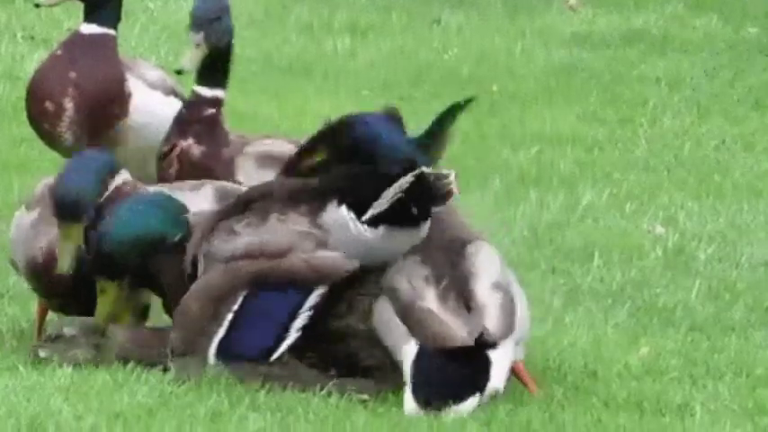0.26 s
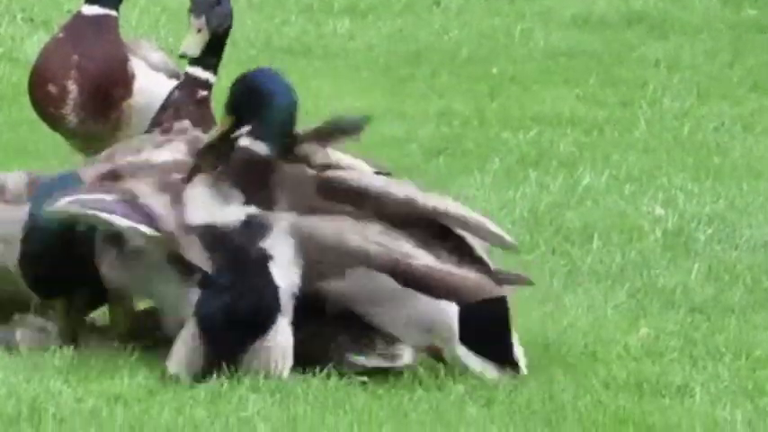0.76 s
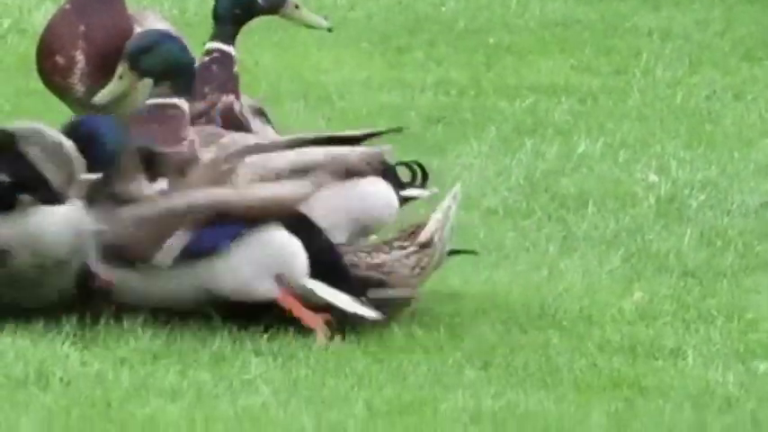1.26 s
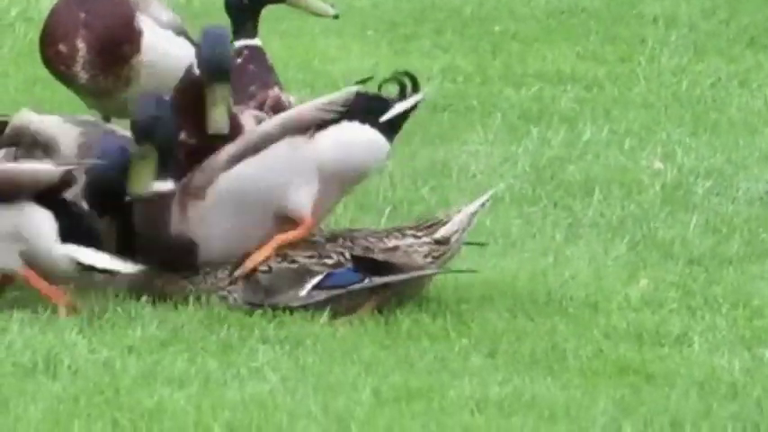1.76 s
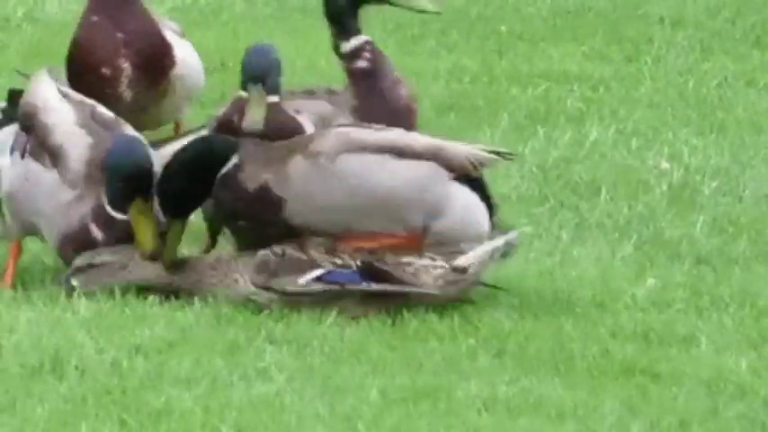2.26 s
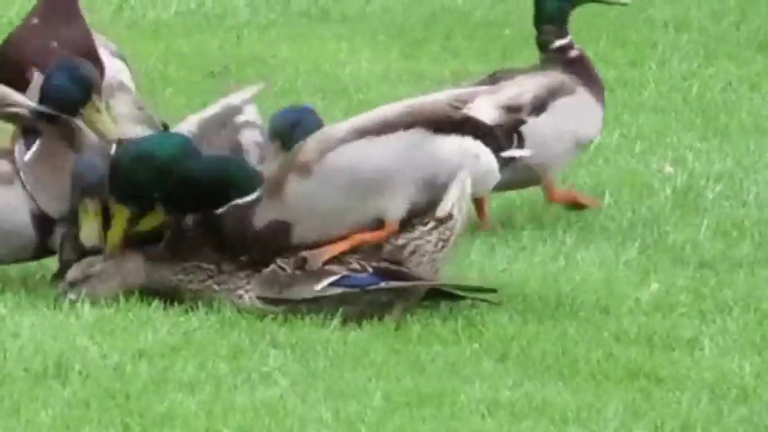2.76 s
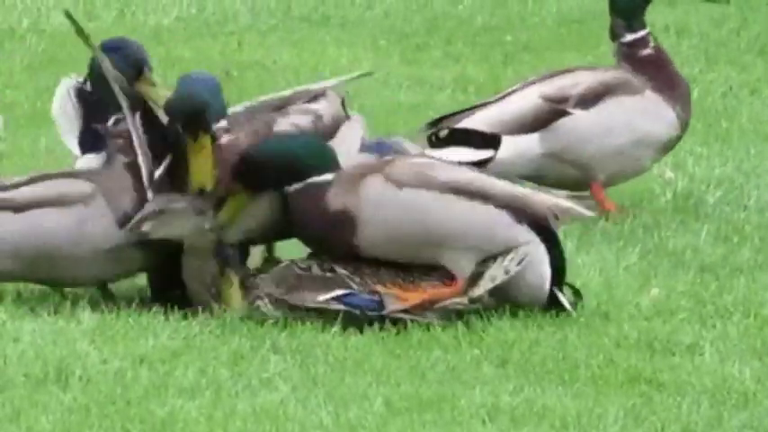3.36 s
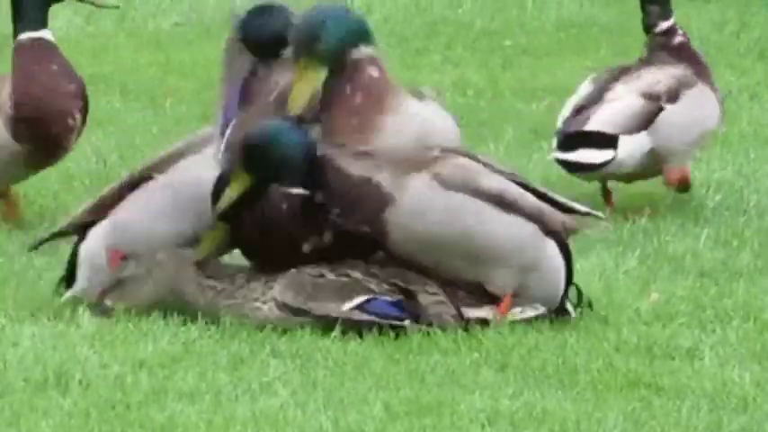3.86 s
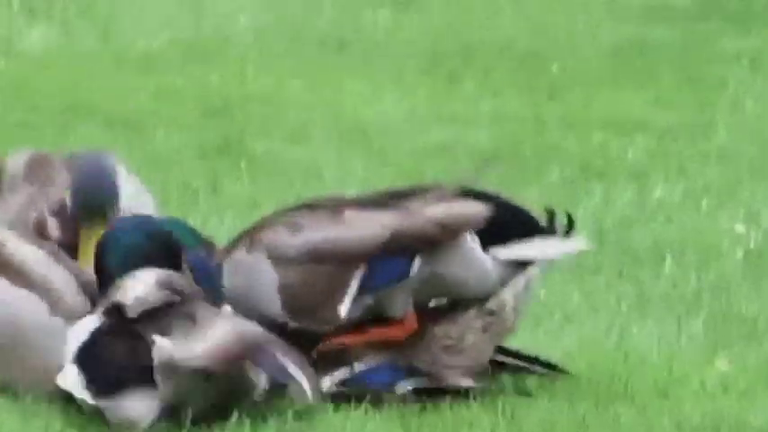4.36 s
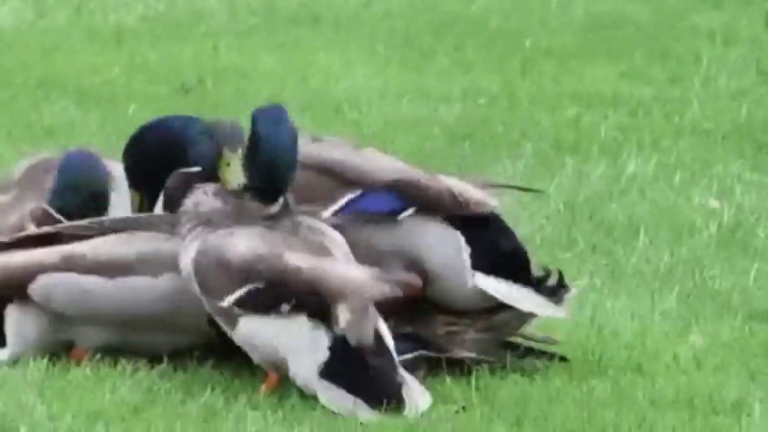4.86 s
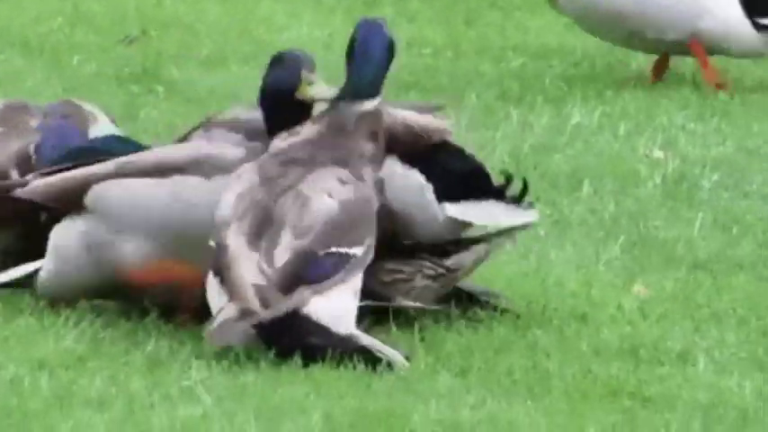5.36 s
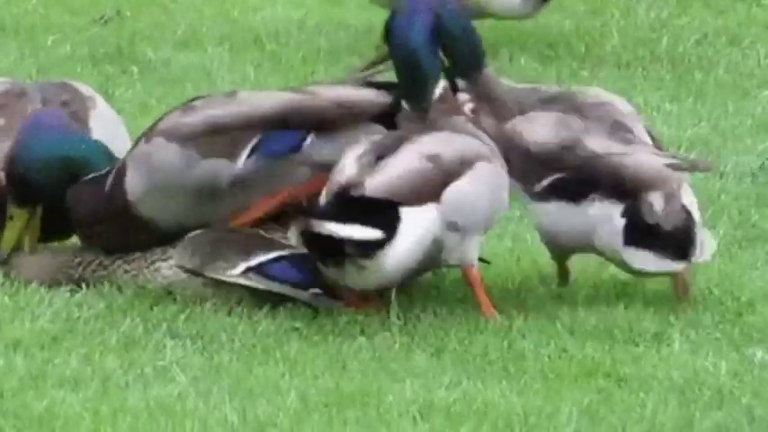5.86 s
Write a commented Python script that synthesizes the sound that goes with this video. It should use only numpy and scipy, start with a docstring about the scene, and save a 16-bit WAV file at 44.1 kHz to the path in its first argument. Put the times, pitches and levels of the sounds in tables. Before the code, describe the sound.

Close outdoor sound of ducks struggling on a lawn: short nasal quacks breaking between clean squeals and rough honks, loudest just after three seconds and again near five. Before them, soft wings flutter quickly and one body knock lands at about two seconds. Dry bill clicks dot the scuffle. High small birds chirp throughout, with far birds behind, light echoes, soft air hiss and low hum.

```python
"""On a lawn, ducks scuffle: a hen quacks in clusters, slipping between clean squeals and rough honks.
Honks are uneven noisy pulses through throat resonances; squeals are a few partials gliding on one pitch.
Bills click as short rings, wings flap as grainy feather noise, and one knock rings a set of struck modes.
Small birds chirp as thin sliding tones and chatter in noisy notes; sparse echoes follow ducks and birds.
Behind lie a faint hiss and low hum, and far birds as patchy banded noise."""
import sys
import numpy as np
from scipy import signal
from scipy.io import wavfile
from scipy.ndimage import uniform_filter1d

SR = 44100
rng = np.random.default_rng(int(sys.argv[2]) if len(sys.argv) > 2 else 0)


def gain_from_db(level_db):
    """Turn a decibel level (scalar or array-like) into a linear amplitude factor."""
    decades = np.asarray(level_db, float) / 20
    return 10 ** decades


def int16_out(signal):
    """Quantize to a 16-bit WAV file."""
    q = np.round(np.clip(np.atleast_2d(signal).T, -1, 1) * 32767)
    wavfile.write(sys.argv[1], SR, q.astype(np.int16))


N = 269892  # samples in the scene

# rough cores of the quacks: (start [s], length [s], effort [dB], highest pitch [Hz], fundamental level [dB])
HONKS = [(0.057, 0.098, -42, 449.7, -46.5), (0.272, 0.0703, -39.5, 432.2, -48),
         (2.956, 0.068, -32.5, 470.6, -45), (3.04, 0.034, -45.5, 438, -53), (3.1, 0.061, -34, 451.5, -50),
         (3.158, 0.087, -22.5, 432.5, -32.5), (3.4, 0.055, -24, 404.3, -34.5),
         (4.749, 0.0544, -34, 462.8, -44), (4.957, 0.028, -28.5, 465, -40),
         (4.981, 0.039, -22.5, 475.8, -34.5), (6.067, 0.029, -28.5, 465.7, -50)]
# squeals that swell into a honk: (start [s], length [s], crest time [s], crest pitch [Hz], level [dB])
LEAD_SQUEALS = [(0.232, .044, 0.262, 1950, -38), (2.944, .017, 2.925, 2000, -34),
                (3.1, .027, 3.145, 1550, -32), (3.128, .03, 3.128, 1880, -26),
                (3.394, .013, 3.385, 2000, -30), (4.72, .04, 4.731, 2170, -39),
                (4.89, .026, 4.945, 1800, -43), (4.935, .04, 4.946, 1820, -25),
                (6.035, .032, 6.045, 2060, -42)]
# squeals that open or close a honk without a swell:
# (start [s], length [s], crest time [s], crest pitch [Hz], level [dB])
END_SQUEALS = [(0.044, .02, 0.028, 1950, -44), (0.335, .03, 0.33, 1850, -45),
               (3.015, .062, 3.032, 1780, -33), (3.234, .025, 3.228, 1350, -29),
               (3.478, .013, 3.445, 2200, -30), (4.798, .037, 4.806, 1800, -34),
               (4.928, .016, 4.94, 1800, -43), (5.015, .041, 5.018, 1820, -31),
               (6.094, .03, 6.108, 1740, -38)]
# squeals that hold or slide in a straight line: (start [s], length [s], first pitch [Hz], last pitch [Hz], level [dB])
HELD_SQUEALS = [(0.073, 0.085, 1406, 1242, -40), (0.279, 0.06, 1360, 1318, -35),
                (2.963, .06, 1317, 1445, -34), (3.153, .015, 1357, 1500, -24.5),
                (3.168, 0.026, 1733, 1850, -29.5), (3.21, 0.028, 1430, 1304, -29),
                (3.215, .02, 1897, 2170, -29.5), (4.835, .035, 850, 720, -52),
                (4.911, .02, 1150, 1780, -32), (3.434, .018, 1184, 1215, -30),
                (4.757, 0.035, 1310, 1400, -30.5), (6.065, 0.021, 1614, 1440, -28)]
# tones within a squeal: (multiple of its pitch [ratio], relative level [dB])
SQUEAL_PARTIALS = [(.5, -13), (1, 0), (1.5, -17), (2, -19)]
# throat resonances with the bill open and steady: (centre [Hz], width [Hz], relative level [dB])
THROAT_MODES = [(850, 230, -14), (1261, 300, -7), (1850, 560, 0), (2252, 280, -2.5), (2686, 600, -5),
                (3500, 270, -17.5), (4047, 214, -16.5), (4740, 220, -17.5)]
# quacks of distant ducks: (start [s], length [s], effort [dB], starting pitch [Hz])
FAR_QUACKS = [(1.182, 0.0776, -48.5, 358.7), (4.069, 0.0724, -60, 398)]
# throat resonances of the distant ducks: (centre [Hz], width [Hz], relative level [dB])
FAR_THROAT_MODES = [(382, 95, -16), (760, 170, 0), (1090, 380, 5.5), (1470, 780, -3.5)]
# bill clicks: (time [s], level of the main ring [dB], ring pitch [Hz])
CLICKS = [(0.013, -50, 2770), (0.211, -40, 560), (0.233, -39, 790), (1.751, -43, 2170),
          (2.019, -38.5, 1830), (2.066, -50, 3330), (2.377, -51.5, 495), (2.457, -52.5, 514),
          (2.896, -45, 643), (2.9, -37.5, 1060), (3.353, -25.5, 1450), (3.3591, -21, 1050),
          (3.367, -24, 1190), (4.332, -43.5, 496), (4.681, -31, 1615), (6, -34, 867)]
# wing strokes, before STROKE_DB and STROKE_SPREAD: (start [s], level [dB], length [s])
WING_STROKES = [(1.538, -44.5, 0.013), (1.578, -39.5, 0.023), (1.603, -32.5, 0.015), (1.618, -36.5, 0.022),
                (1.655, -44, 0.024), (1.698, -39.5, 0.023), (1.724, -51.5, 0.014), (1.761, -45.5, 0.017),
                (1.796, -50, .02), (1.833, -45.5, 0.021), (1.859, -42, 0.02), (1.893, -41, 0.022),
                (1.948, -40, 0.019), (2.002, -41, 0.018), (2.046, -49, 0.027), (2.089, -52.5, .02),
                (2.119, -50.5, 0.023), (2.174, -53.5, 0.026), (2.211, -52, 0.018), (2.251, -56, 0.021)]
# feathers sliding between strokes: (time [s], level [dB])
FEATHER_SLIDE = [(1.53, -72), (1.6, -66.5), (2.2, -66.5), (2.4, -82)]
# spectrum of feather noise: (frequency [Hz], relative level per Hz [dB])
FEATHER_SPECTRUM = [(300, -15.5), (1000, -9), (2000, -1), (3200, 3), (5500, 0), (7500, -5), (8400, -8),
                    (9000, -23)]
# modes rung by the knock: (frequency [Hz], relative level [dB], time to fall 60 dB [s])
KNOCK_MODES = [(242, -7, 0.01), (673, 5, 0.011), (940, 1.5, 0.022), (1400, -8.5, 0.027),
               (2790, -6.5, 0.013), (4870, -10, 0.0088)]
# chirps that slide down and level off: (start [s], length [s], top pitch [Hz], low pitch [Hz], level [dB])
SLIDING_CHIRPS = [(0.41, .07, 3560, 2615, -57), (0.545, 0.082, 4250, 2973, -57),
                  (0.651, 0.066, 4425, 2557, -54.5), (2.887, 0.068, 4060, 3050, -60.5),
                  (3.035, 0.078, 4130, 3980, -48.5), (3.247, .06, 3900, 3570, -53),
                  (3.452, .08, 4140, 3260, -49), (5.26, 0.046, 4520, 3500, -56.5),
                  (5.296, 0.067, 3890, 3306, -50), (5.523, 0.055, 2495, 2125, -63),
                  (5.918, 0.088, 4420, 3293, -58.5)]
# chirps that drop fast and then hold low: (start [s], length [s], top pitch [Hz], low pitch [Hz], level [dB])
SETTLING_CHIRPS = [(0.765, 0.082, 4420, 3020, -59.5), (1.397, .08, 4270, 3400, -63),
                   (3.788, .075, 4010, 3092, -54), (4.04, 0.064, 4150, 3220, -52.5),
                   (4.67, 0.081, 4300, 3398, -56.5)]
# chirps that fall and hook back up: (start [s], fall time [s], top pitch [Hz], low pitch [Hz], level [dB])
HOOKED_CHIRPS = [(1.095, 0.031, 3986, 3395, -55.5), (2.48, 0.045, 4150, 3700, -62.5),
                 (2.765, 0.044, 4100, 3800, -55.5), (3.787, .058, 4455, 3500, -55.5),
                 (4.075, 0.053, 4390, 3470, -52.5), (4.377, 0.023, 3880, 3346, -51.5),
                 (4.407, 0.057, 4320, 3616, -51.5), (4.714, 0.027, 3910, 3427, -50.5),
                 (5.036, 0.039, 4200, 3650, -46), (5.05, 0.026, 3895, 3410, -45.5),
                 (5.562, .062, 4350, 3560, -56)]
# harsh chatter notes: (start [s], level [dB], decay length [s])
CHATTER_NOTES = [(0.018, -59, 0.038), (0.065, -44.5, 0.0079), (0.095, -49, 0.016), (0.144, -54.5, 0.029),
                 (0.191, -49, 0.018), (0.22, -52, 0.044), (0.27, -48, 0.012), (0.298, -52, 0.0077),
                 (0.341, -53, 0.027), (0.388, -57.5, 0.025), (0.414, -58, 0.015), (0.431, -55, 0.023),
                 (4.255, -50, 0.012), (4.275, -48.5, 0.008), (5.437, -60.5, 0.027), (5.647, -42.5, 0.0065),
                 (5.66, -53, 0.017)]
# fixed bands of the chatter: (centre [Hz], width [Hz], relative level [dB])
CHATTER_BANDS = [(2710, 140, 0), (3576, 410, 4), (4490, 140, -12), (5435, 176, 4), (5810, 230, -11),
                 (6910, 220, -9)]
# swells of the far birds: (time [s], level [dB])
FAR_BIRD_LEVEL = [(0, -68.5), (.45, -68), (.75, -74), (2.8, -76), (3.55, -62), (4.6, -67.5), (5.2, -70),
                  (6.2, -72)]
# spectrum of the far birds: (frequency [Hz], relative level per Hz [dB])
FAR_BIRD_SPECTRUM = [(3000, -13.5), (3400, -4.5), (3800, -7), (4300, -14), (5500, -17.5), (6000, -50.5)]
# spectrum of the outdoor hiss: (frequency [Hz], relative level per Hz [dB])
AIR_SPECTRUM = [(15, -48), (28, -14.5), (50, 5.5), (70, 12), (106, 9.5), (234, 2.5), (627, -1.5),
                (1570, -9), (1900, -8.5), (2200, -17), (2710, -11), (2950, -17.5), (3710, -22.5),
                (4820, -23), (5600, -26), (8160, -45.5)]

# Voice: pulses alternate strong and weak; each carries a puff of noise
HONK_NOISE_SHARE, FAR_NOISE_SHARE = 0.55, 0.58
PAIR_DB, UNEVEN_DB = 3.5, 1.8  # strong-weak step and scatter, both scaled by the noise share
PAIR_HOLD = 0.9  # a normal draw below this swaps strong and weak at the next pulse
PUFF_DECAY_CYCLES = 0.45
BILL_SAG, BILL_WANDER = 0.26, 0.09  # fraction by which resonances drop as the bill shuts, and wander
BODY_TOP_HZ = 3350  # low-pass on the body of the voice; the thin resonances bypass it
HONK_RISE_S, HONK_FALL_S, HONK_TAIL_S = 0.012, 0.006, 0.024
SWELL_DB, TAIL_DB = 2, -14.5  # effort grows through the core, then drops to the tail
PITCH_ARCH, END_SAG = 0.03007, 0.05  # fractions of the pitch
FAR_SWELL_DB, FAR_PITCH_RISE = 6.5, 0.163  # the rise is a fraction of the pitch

# Squeals
RISE_BEND_HZ_PER_S2, FALL_BEND_HZ_PER_S2 = 420000, 620000
LOWEST_HZ = 990  # where a falling squeal levels off
LEAD_SWELL_DB_PER_S, SWELL_RANGE_DB = 700, 17  # a swell starts no softer than the range
RASP_DB, RASP_HZ = -9, 440  # rough voice under a squeal

# Bills and wings
SCRAPE_DB, SCRAPE_T60_S = -13.5, 0.1  # a click drags a short scrape behind it
STROKE_DB, STROKE_RISE_S, STROKE_SPREAD = -5, 0.015, 1.28
KNOCK_S, KNOCK_DB, PUSH_DB = 1.9285, -30, -40.5

# Small birds and background
SLIDE_POWER, SETTLE_POWER, HOOK_POWER = 1.6, 2.8, 1.6  # higher falls faster at first
HOOK_S, HOOK_HZ = 0.043, 300
CHIRP_RISE_DB, CHIRP_FADE_DB = 6, 5  # softer at either end
CHATTER_RISE_S = 0.002
AIR_DB, HUM_HZ, HUM_DB = -63.5, 108, -72

# Bass cut under loud sound: threshold, cut per dB above it, limit
BASS_CUT_FROM_DB, BASS_CUT_SLOPE, BASS_CUT_MOST_DB = -38, 1.6, 15.5


def evened(x):
    """Scales to rms 1."""
    return x / np.sqrt(np.mean(x ** 2) + 1e-20)


def span(length):
    """Sample times from zero to length."""
    return np.arange(0, length, 1 / SR)


def add(mix, start, sound):
    """Mixes a sound in at its start time, cutting what runs past the end."""
    part = mix[round(start * SR):][:len(sound)]
    part += sound[:len(part)]


def level_curve(rows):
    """Joins (time, level) rows by straight lines, one value a sample."""
    times, levels = np.transpose(rows)
    return np.interp(np.arange(times[0], times[-1], 1 / SR), times, levels)


def wobble(n, hz):
    """Random drift of rms 1: white noise smoothed by a one-pole low-pass."""
    noise = rng.standard_normal(n + 2000)
    drift = signal.lfilter([1], [1, -np.exp(-2 * np.pi * hz / SR)], noise)
    return evened(drift[2000:])  # skip the filter's start


def dulled(x, hz):
    """Steep low-pass."""
    return signal.sosfilt(signal.butter(10, hz, fs=SR, output="sos"), x)


def resonate(x, hz, width):
    """A steep-sided resonance of gain 1, fixed or moving: shift to zero, smooth, shift back."""
    turn = np.exp(2j * np.pi * np.cumsum(hz * np.ones(len(x))) / SR)
    smoother = signal.butter(2, width / 2, fs=SR, output="sos")
    return 2 * (turn * signal.sosfilt(smoother, x / turn)).real


def through(x, modes, stretch=1):
    """Sum of resonances with alternating sign, all centres raised by stretch."""
    out = 0
    for k, (hz, width, db) in enumerate(modes):
        out = out + (-1) ** k * gain_from_db(db) * resonate(x, hz * stretch, width)
    return out


def ring(hz, t60):
    """A struck mode: a sine that dies away by 60 dB in t60 seconds."""
    t = np.arange(4000) / SR
    return np.sin(2 * np.pi * hz * t) * gain_from_db(-60 * t / t60)


def coloured(points, patchy_db, size):
    """Noise of a given spectrum whose level drifts in patches of time and pitch."""
    frames = 4 * N // size + 8
    bins_hz = np.fft.rfftfreq(size, 1 / SR)
    real, imaginary, patches = rng.standard_normal((frames, len(bins_hz), 3)).T
    patches = evened(uniform_filter1d(uniform_filter1d(patches, 6, 0), 10, 1))
    hz, db = np.transpose(points)
    shape_db = np.interp(np.log(bins_hz + 1), np.log(hz + 1), db, right=-90)
    spectrum = (real + 1j * imaginary) * gain_from_db(shape_db[:, None] + patchy_db * patches)
    return evened(signal.istft(spectrum, nperseg=size, noverlap=3 * size // 4)[1][:N])


def folds(hz, rough, jitter, count):
    """Voice pulses, strong and weak in drifting turns and uneven in size, each with a short puff of noise."""
    turns = np.cumsum(hz * (1 + jitter * rough * wobble(len(hz), 220))) / SR
    pulses = sum(np.cos(2 * np.pi * k * turns) for k in range(2, count))  # no fundamental
    chance, slip = rng.standard_normal((200, 2)).T
    pairs = (-1.0) ** np.cumsum(slip < PAIR_HOLD)
    pulse_db = rough * (PAIR_DB * pairs + UNEVEN_DB * np.clip(chance, -2, 1.5))
    size = gain_from_db(pulse_db)[(turns + 0.1).astype(int)]  # one size for each turn
    puffs = (0.12 + np.exp(-(turns % 1) / PUFF_DECAY_CYCLES)) * rng.standard_normal(len(hz))
    return (1 - rough) * evened(pulses * size) + rough * evened(puffs * size)


def rasp(effort_db, hz):
    """Chaotic pulses through the throat; the bill opens with effort, raising and brightening the resonances."""
    drive = folds(hz, HONK_NOISE_SHARE, 0.11, count=12)
    opening = gain_from_db(0.62 * (effort_db - effort_db.max()))
    stretch = 1 - BILL_SAG * (1 - opening) + BILL_WANDER * wobble(len(hz), 25)
    body = through(drive, THROAT_MODES[:3], stretch)
    body = body - opening * through(drive, THROAT_MODES[3:5], stretch)
    flicker = gain_from_db(4 * wobble(len(hz), 27))
    thin = opening * flicker * through(drive, THROAT_MODES[5:])
    return gain_from_db(effort_db) * evened(dulled(body, BODY_TOP_HZ) - thin)


def honk(start, length, effort_db, pitch_hz, low_db):
    """A quick rise, a swelling core and a weak tail of rasp over a wavering fundamental."""
    t = span(HONK_RISE_S + length + HONK_TAIL_S) - HONK_RISE_S
    u = np.clip(t / length, 0, 1)
    hz = pitch_hz * (1 - PITCH_ARCH * (2 * u - 1) ** 2 - END_SAG * u ** 6)
    corners = [-HONK_RISE_S, 0.16 * length, 0.78 * length, length + HONK_FALL_S, length + HONK_TAIL_S]
    shape_db = np.interp(t, corners, [-20, -SWELL_DB, 0, TAIL_DB, -34])
    low_shape_db = np.interp(t, corners, [-31, -3, 0.5, -21.5, -44.5])
    low_level = np.sqrt(2) * gain_from_db(low_db + low_shape_db + 2.5 * wobble(len(hz), 67))
    low_turns = np.cumsum(hz * (1 + 0.035 * wobble(len(hz), 60))) / SR
    low = low_level * np.sin(2 * np.pi * low_turns)
    return start - HONK_RISE_S, (rasp(effort_db + shape_db, hz) + low) * signal.windows.tukey(len(hz), 0.05)


def whistle(hz, db, partials, waver, flutter_db):
    """A few clean partials on one gliding pitch, slightly unsteady in pitch and level."""
    turns = np.cumsum(hz * (1 + waver * wobble(len(hz), 74))) / SR
    tone = sum(gain_from_db(partial_db) * np.sin(2 * np.pi * k * turns) for k, partial_db in partials)
    flutter = flutter_db * np.clip(wobble(len(hz), 77), -2.5, 1.2)
    return np.sqrt(2) * gain_from_db(db + flutter) * tone * signal.windows.tukey(len(hz), 0.2)


def squeal(start, length, crest, crest_hz, db, swell_db_per_s):
    """A piece of one pitch arch, gentler up than down, with some rasp beneath."""
    t = span(length)
    since = start + t - crest
    rising = crest_hz / (1 + RISE_BEND_HZ_PER_S2 * since ** 2 / crest_hz)
    falling = np.maximum(crest_hz - FALL_BEND_HZ_PER_S2 * since ** 2, LOWEST_HZ)
    hz = np.where(since < 0, rising, falling)
    # the swell is complete 6 ms before the end
    level_db = db - np.clip(swell_db_per_s * (length - 0.006 - t), 0, SWELL_RANGE_DB)
    rough = rasp(level_db + RASP_DB, RASP_HZ + 0 * t) * signal.windows.tukey(len(t), 0.3)
    return start, whistle(hz, level_db, SQUEAL_PARTIALS, waver=0.012, flutter_db=2.5) + rough


def held_squeal(start, length, first_hz, last_hz, db):
    """A single tone that moves in a straight line of pitch, standing out of the honk."""
    hz = first_hz + (last_hz - first_hz) * span(length) / length
    tone = whistle(hz, db, [(1, 0)], waver=0.03, flutter_db=3)
    return start, signal.windows.tukey(len(hz), 0.6) * tone


def far_quack(start, length, effort_db, pitch_hz):
    """A cleaner, duller call from further off, swelling softly and rising in pitch at the end."""
    u = span(length) / length
    hz = pitch_hz * (1 + FAR_PITCH_RISE * u ** 3)
    voice = folds(hz, FAR_NOISE_SHARE, 0.02, count=7) + np.cos(2 * np.pi * np.cumsum(hz) / SR)
    level = gain_from_db(effort_db - FAR_SWELL_DB * (1 - u) ** 2) * signal.windows.tukey(len(hz), 0.35)
    return start, level * evened(through(voice, FAR_THROAT_MODES))


def clicks():
    """Each bill click is a dry snap: a brief ring between a duller and a brighter one, then a scrape."""
    out = np.zeros(N)
    scrape_fall_db = -60 * np.arange(4000) / SR / SCRAPE_T60_S
    for start, db, hz in CLICKS:
        snap = ring(hz, 0.014) + 0.6 * ring(0.45 * hz, 0.014) + 0.6 * ring(1.8 * hz, 0.006)
        add(out, start, gain_from_db(db) * snap)
        scrape = evened(resonate(rng.standard_normal(4000), hz, 1.4 * hz))
        add(out, start, gain_from_db(db + SCRAPE_DB + scrape_fall_db) * scrape)
    return signal.sosfilt(signal.butter(2, 170, "highpass", fs=SR, output="sos"), out)


def knock():
    """A wing strikes a body: a low push of air, then the blow and two quick rebounds ring its modes."""
    out = np.zeros(N)
    t = np.arange(-700, 700) / SR
    push = np.cos(2 * np.pi * 115 * t) * np.exp(-(t / 0.012) ** 2)
    add(out, KNOCK_S - 0.006 - 700 / SR, gain_from_db(PUSH_DB) * push)  # centred 6 ms ahead of the blow
    blow = -sum(gain_from_db(db) * ring(hz, t60) for hz, db, t60 in KNOCK_MODES)
    for delay, db in [(0, -0.5), (0.0045, -5.5), (0.0102, -5.5)]:  # (delay [s], level [dB])
        add(out, KNOCK_S + delay, gain_from_db(KNOCK_DB + db) * blow)
    return out


def flaps():
    """Feather noise made of small scrapes: bright puffs with each wing stroke over a duller sliding."""
    level, slide = np.zeros(N), np.zeros(N)
    t = np.arange(4000) / SR
    add(slide, FEATHER_SLIDE[0][0], gain_from_db(level_curve(FEATHER_SLIDE)))
    for start, db, length in WING_STROKES:
        puff = np.minimum(t / STROKE_RISE_S, 1) * np.exp(-(t / length / STROKE_SPREAD) ** 2)
        add(level, start, gain_from_db(db + STROKE_DB) * puff)
    grains = evened(gain_from_db(1.1 * wobble(N, 250)))
    rustle = grains * coloured(FEATHER_SPECTRUM, patchy_db=4.5, size=512)
    sliding = slide * gain_from_db(2.1 * wobble(N, 30)) * dulled(rustle, 7450)
    return level * rustle + sliding


def chirp(start, fall, top_hz, low_hz, db, power, hook):
    """One thin tone that falls fast, levels off and may turn up again."""
    t = span(fall + hook)
    hz = low_hz + (top_hz - low_hz) * np.maximum(1 - t / fall, 0) ** power
    hz = hz + HOOK_HZ * (np.maximum(t - fall, 0) / HOOK_S) ** 2
    u = t / t[-1]
    level_db = db - CHIRP_RISE_DB * np.maximum(1 - 4 * u, 0) - CHIRP_FADE_DB * u ** 3
    return start, whistle(hz, level_db, [(1, 0)], waver=0.005, flutter_db=2.6)


def chatter():
    """Short noisy bird notes with a sharp start, through fixed bands."""
    level = np.zeros(N)
    t = np.arange(3000) / SR
    for start, db, length in CHATTER_NOTES:
        note = np.minimum(t / CHATTER_RISE_S, 1) * np.exp(-(t / length) ** 2)
        add(level, start, gain_from_db(db) * note)
    return level * evened(through(rng.standard_normal(N), CHATTER_BANDS))


def echoes(x, t60):
    """Sparse reflections from ground and nearby walls: scattered taps of random sign that die away."""
    taps = np.zeros(8820)
    at = np.arange(200, 8800, 20) + rng.integers(0, 20, 430)
    taps[at] = rng.choice([-1.0, 1.0], 430) * gain_from_db(-60 * at / SR / t60)
    return signal.oaconvolve(x, taps / np.linalg.norm(taps))[:N]


def air():
    """The outdoor hiss, a wavering low hum of narrow noise, and far birds as swelling banded noise."""
    hiss = gain_from_db(AIR_DB) * coloured(AIR_SPECTRUM, patchy_db=4, size=2048)
    hum = gain_from_db(HUM_DB) * evened(resonate(rng.standard_normal(N), HUM_HZ, 40))
    far_birds = gain_from_db(level_curve(FAR_BIRD_LEVEL)[:N]) * coloured(FAR_BIRD_SPECTRUM, patchy_db=5, size=512)
    return hiss + hum + far_birds


def scene():
    """All sources reach one microphone; ducks and small birds have their own echoes."""
    ducks, birds = dulled(clicks(), 2400), chatter()
    for row in HONKS:
        add(ducks, *honk(*row))
    for row in LEAD_SQUEALS:
        add(ducks, *squeal(*row, LEAD_SWELL_DB_PER_S))
    for row in END_SQUEALS:
        add(ducks, *squeal(*row, 0))
    for row in HELD_SQUEALS:
        add(ducks, *held_squeal(*row))
    for row in FAR_QUACKS:
        add(ducks, *far_quack(*row))
    for row in SLIDING_CHIRPS:
        add(birds, *chirp(*row, SLIDE_POWER, 0))
    for row in SETTLING_CHIRPS:
        add(birds, *chirp(*row, SETTLE_POWER, 0))
    for row in HOOKED_CHIRPS:
        add(birds, *chirp(*row, HOOK_POWER, HOOK_S))
    ducks = dulled(ducks + knock(), 5300)
    near = ducks + birds + flaps()
    reflected = gain_from_db(-13.5) * echoes(ducks, t60=0.2) + gain_from_db(-12.5) * echoes(birds, t60=0.068)
    mono = near + reflected + air()
    return np.array([mono, mono])


def low_pass(x):
    """Removes everything above the highest recorded frequency."""
    return signal.sosfilt(signal.butter(12, 11300, fs=SR, output="sos"), x)


def record(dry):
    """Loud sound above the bass pulls the bass down while it lasts; the two channels differ faintly."""
    bass = signal.sosfiltfilt(signal.butter(4, 290, fs=SR, output="sos"), dry)
    above = dry - bass
    power = abs(uniform_filter1d(above[0] ** 2, 1500))
    loud_db = 10 * np.log10(power + 1e-12)
    cut_db = np.clip(BASS_CUT_SLOPE * (loud_db - BASS_CUT_FROM_DB), 0, BASS_CUT_MOST_DB)
    levelled = above + bass * gain_from_db(-cut_db)
    stray = gain_from_db(-39) * levelled[0] * wobble(N, 300)  # opposite in the two channels
    return low_pass(levelled + np.array([stray, -stray]))


dry = scene()
out = record(dry)
int16_out(out)
```